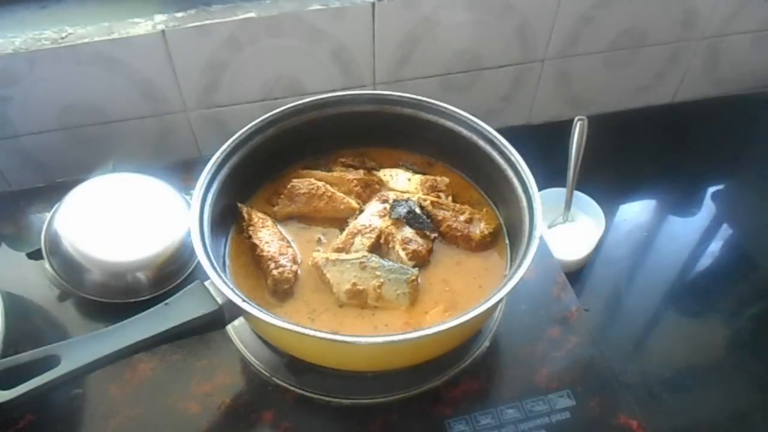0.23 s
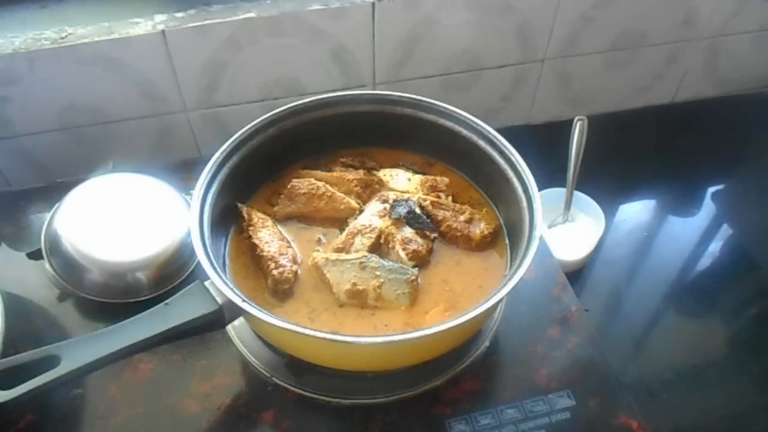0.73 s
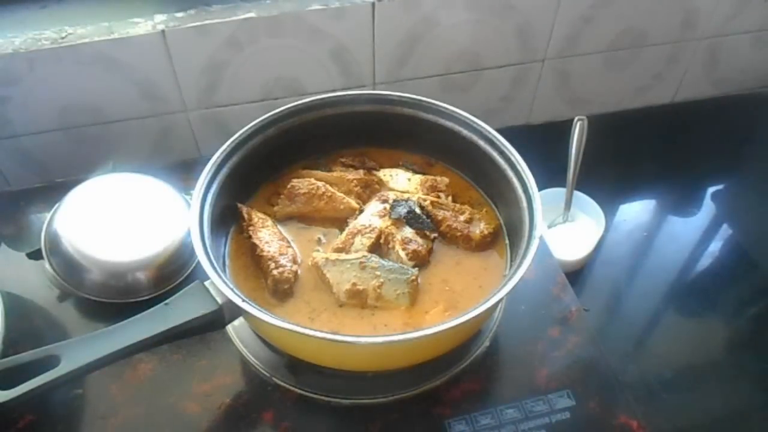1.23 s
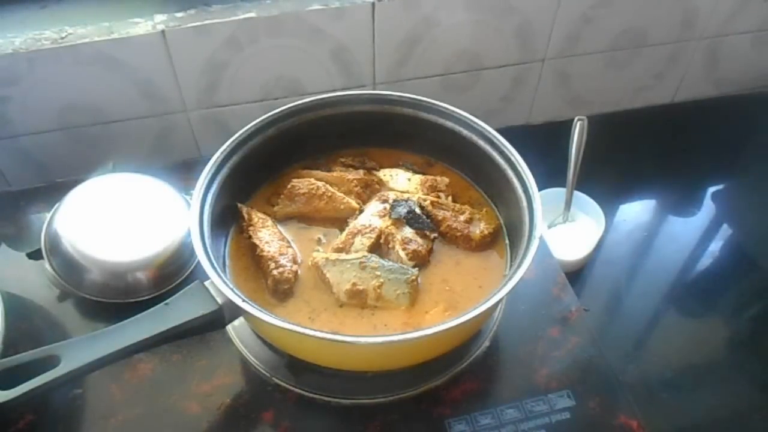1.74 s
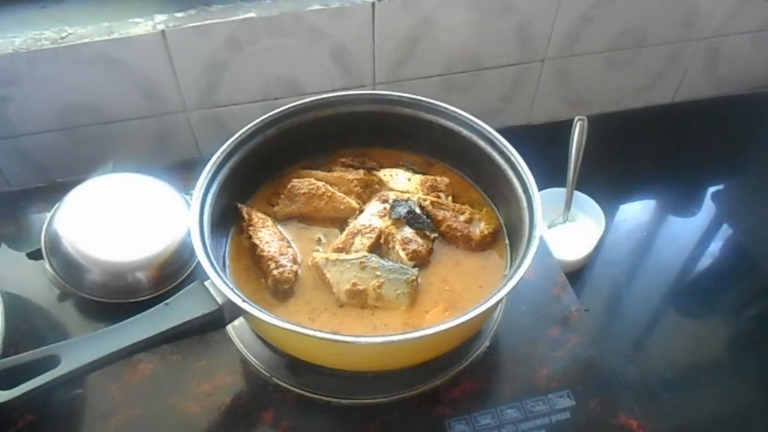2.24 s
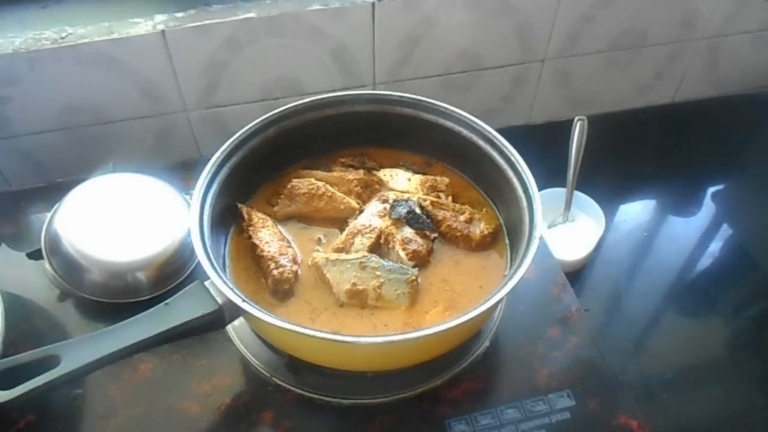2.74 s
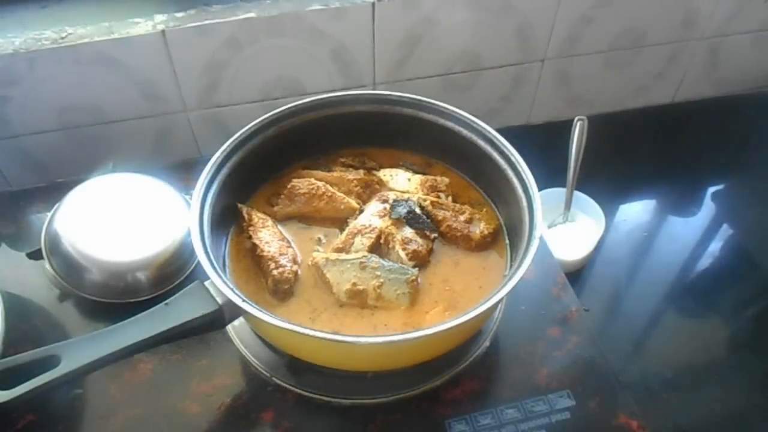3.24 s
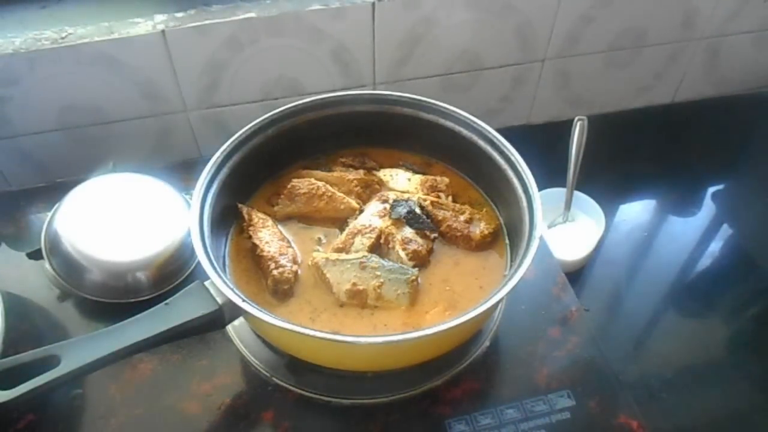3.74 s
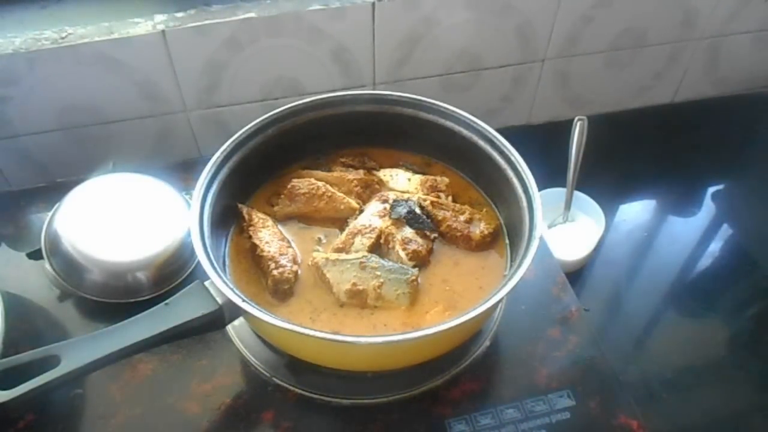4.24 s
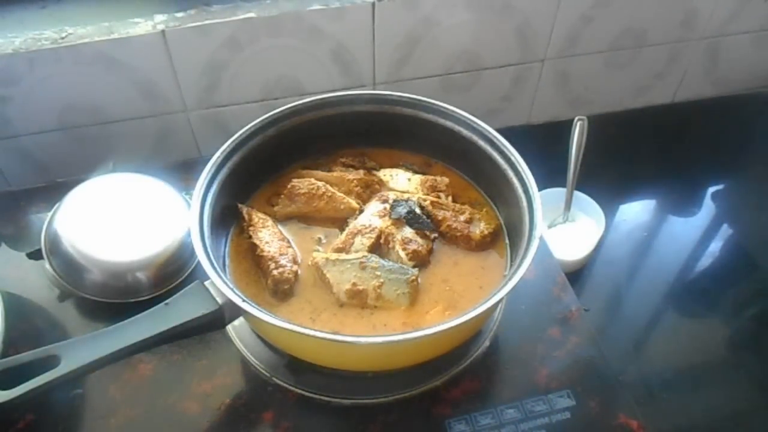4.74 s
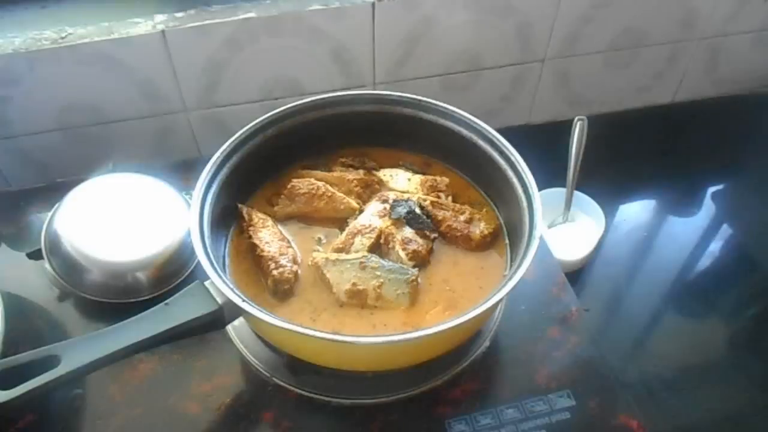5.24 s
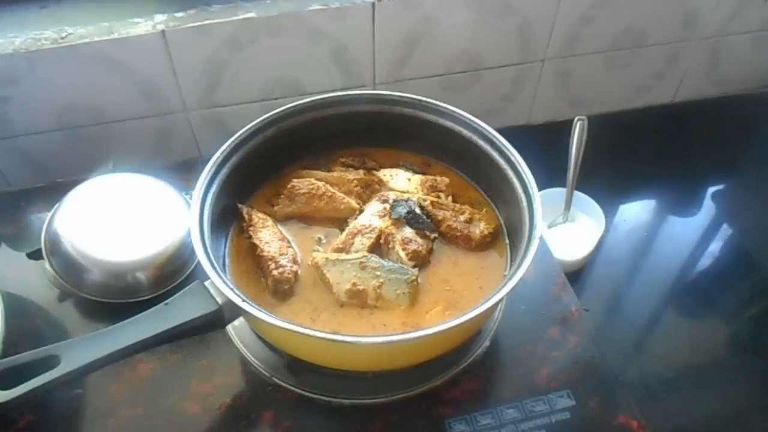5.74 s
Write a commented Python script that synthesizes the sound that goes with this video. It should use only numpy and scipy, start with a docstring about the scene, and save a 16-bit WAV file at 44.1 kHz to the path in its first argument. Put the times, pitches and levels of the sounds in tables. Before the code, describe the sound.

Thin curry heats in a metal pan over a softly rushing burner, with steam squeals, bubble pings, spitting drops and one brief pan clatter.

```python
"""Thin fish curry heats in a metal pan on a gas stove, close to the microphone in a tiled kitchen.
Throughout, the burner rushes as shaped noise and sauce sizzles at the hot wall as grainy noise in surges.
From the start steam squeals out as chains of tiny bubbles, single bubbles ping as decaying sines and
drops spit as noise bursts; after half a second the pan clatters briefly on its damped modes.
Squeals return from 1.4 s on, and single bubbles crowd the second half."""
import sys
import numpy as np
from scipy import signal
from scipy.fft import rfft, irfft
from scipy.io import wavfile
from scipy.ndimage import map_coordinates

SR = 44100
rng = np.random.default_rng(int(sys.argv[2]) if len(sys.argv) > 2 else 0)


def wav_record(signal):
    """Record a signal, one row per channel, as 16-bit PCM in the file named by sys.argv[1]."""
    frames = np.transpose(np.atleast_2d(signal))
    bounded = np.clip(frames, -1, 1)
    # unit amplitude maps onto the largest positive 16-bit level
    quanta = np.round(bounded * 32767).astype(np.int16)
    wavfile.write(sys.argv[1], SR, quanta)


N = 264600
TIME = np.arange(N) / SR  # s

# Every colour is a relative noise spectrum: f/Hz, density/dB per Hz.
# Steam vents: start/s, length/s, rise/s, level before layer gain/dB, top pitch before glide and scoop/Hz,
# glide over the length/octave, half the greatest drop below the top pitch at mid-length/octave
STEAM_VENTS = [(0, 0.09, 0.015, -38, 4250, 0.043, 0.88), (0.073, 0.036, 0.011, -25, 4940, -0.19, 0.32),
               (.122, 0.062, 0.012, -29, 3820, -0.39, 0.24),
               (0.182, 0.24, 0.043, -51.5, 308.6, -0.036, 0.27),
               (0.203, 0.041, 0.0095, -28.5, 4800, 0.12, .35),
               (0.225, 0.067, 0.037, -28, 2690, 0.71, 0.336), (.26, 0.39, 0.023, -36, 3290, -0.215, 0.494),
               (0.458, 0.12, 0.039, -39.5, 903, -0.079, 0.41), (1.379, 0.5, 0.13, -44, 2000, -0.071, 0.46),
               (2.071, 0.12, 0.038, -34.5, 6300, -.06, 0.067),
               (2.136, 0.089, 0.025, -39.5, 2650, -0.47, 0.28), (2.151, .2, 0.063, -39, 5830, -0.073, 0.37),
               (2.412, .25, 0.027, -36.5, 6100, -0.073, 0.41), (2.695, 0.17, .05, -41.5, 6340, -0.66, 0.34),
               (2.732, .09, 0.036, -31.5, 4990, -.6, 0.145), (2.792, 0.19, .045, -32, 4188, -0.057, 0.235),
               (3.88, 0.097, 0.081, -34.5, 2570, 0.466, 0.536),
               (4.328, 0.28, 0.14, -36, 6510, -0.066, 0.47), (4.489, .16, 0.04, -43.5, 2407, -0.38, 0.41),
               (4.747, 0.26, 0.052, -41, 3580, -0.28, 0.65), (5.626, 0.32, 0.014, -35.5, 6020, -0.12, 0.37),
               (5.739, 0.3, .08, -40, 2393, -0.37, .8), (5.824, 0.05, 0.021, -30, 3830, 0.02, 0.11),
               (5.924, 0.091, 0.028, -40, 3690, .25, 0.16)]
# Single bubbles: t/s, f/Hz, nominal peak level/dB, ring t60/s
SINGLE_BUBBLES = [(0.063, 1870, -27, 0.036), (.078, 1986, -22, 0.023), (.19, 1347, -36.5, 0.22),
                  (1.654, 4650, -41, 0.065), (2.511, 3940, -28.5, 0.023), (2.723, 3860, -28, 0.023),
                  (3.147, 2175, -22, 0.039), (3.153, 2250, -24, .014), (3.573, 1640, -27.5, 0.046),
                  (3.596, 3600, -32, 0.028), (3.625, 3350, -27, 0.03), (3.726, 2425, -14, 0.035),
                  (3.82, 5560, -38, .02), (3.914, 2640, -27, 0.0087), (3.94, 3050, -19, 0.0037),
                  (4.505, 1970, -31, 0.023), (4.732, 4640, -25.5, 0.011), (4.757, 2600, -25.5, 0.027),
                  (4.761, 3640, -26, 0.013), (4.791, 2830, -25.5, 0.021), (4.844, 5700, -33, 0.013),
                  (4.852, 2730, -25.5, 0.03), (4.892, 3920, -30, 0.027), (4.92, 2550, -12, 0.003),
                  (4.922, 1550, -24.5, 0.027), (5.107, 6300, -29, 0.033), (5.166, 5700, -30, .018),
                  (5.752, 2020, -28, .018), (5.79, 753, -31, 0.078), (5.83, 1950, -24, .02),
                  (5.859, 1980, -22, 0.021), (5.887, 1790, -24, 0.041), (5.899, 1440, -26, .02)]
# Spitting drops: t/s, level before layer gain/dB, burst t60/s, pan ring relative to burst/dB
SPITTING_DROPS = [(0.0802, -37, 0.039, -13), (0.2148, -27.5, 0.02, -5), (1.1226, -42.5, 0.038, -2),
                  (1.793, -22, 0.043, -9), (2.1228, -18.5, 0.031, -41), (3.1312, -37.5, 0.036, -11),
                  (3.2964, -40.5, 0.078, -22), (3.8363, -47.5, 0.05, 4), (4.2783, -27, 0.015, -20),
                  (4.3051, -21.5, 0.22, -6), (4.6284, -46, 0.026, -1), (4.9151, -39, 0.033, 0.5),
                  (5.7836, -23.5, 0.044, -13.5)]
# Colour of a spit: f/Hz, density/dB per Hz
SPIT_SPECTRUM = [(50, -73), (300, -17), (830, -8.5), (1500, -20), (2450, 0), (3300, -6.5), (4700, -3),
                 (5700, 13), (6900, 6), (7900, -1), (9800, -9), (12500, -35)]
# Surges of sizzle: crest t/s, level before layer gain/dB, swell time constant/s, dying time constant/s
SIZZLE_SURGES = [(.005, -39, .02, 0.027), (.08, -35, 0.013, 0.022), (.15, -38, 0.041, 0.081),
                 (.25, -42.5, 0.033, 0.067), (.36, -49, .05, 0.17), (.85, -48.5, 0.026, 0.065),
                 (.985, -52.5, 0.016, 0.031), (2.15, -52, 0.11, .07), (2.85, -55, 0.11, 0.1),
                 (3.035, -51, 0.046, 0.24), (3.51, -50.5, 0.17, .05), (3.74, -53.5, 0.018, 0.037),
                 (3.93, -53, .06, 0.038), (4.31, -43, .08, .24), (4.57, -43.5, .015, 0.0094),
                 (4.655, -48, 0.03, 0.011), (4.93, -46.5, .012, 0.047), (5.22, -51, 0.26, 0.069),
                 (5.41, -47.5, .02, 0.029), (5.465, -48.5, 0.025, .025), (5.8, -45, 0.08, 0.12),
                 (5.91, -44.5, .05, 0.023)]
# Colour of the sizzle: f/Hz, density/dB per Hz
SIZZLE_SPECTRUM = [(300, -29), (900, -1), (2000, 7), (4000, 12), (6300, 6), (8000, 1.5), (9800, -10.5),
                   (12500, -22.5)]
# Knocks of the pan: t/s, chatter level/dB, chatter t60/s, ring relative to chatter/dB,
# favoured f/Hz, lift at that f/dB
PAN_KNOCKS = [(.548, -27.5, 0.28, -12.5, 830, 26), (0.593, -35.5, 0.15, -1.5, 3230, -6),
              (.616, -15, 0.049, -14, 845, 5.5), (0.648, -28.5, 0.11, -19.5, 1440, 35),
              (.677, -19.5, 0.039, -16, 380, 10.5)]
# Modes of the metal pan: f/Hz, relative level/dB, t60/s
PAN_MODES = [(366.5, -2.5, 0.37), (632, -8, 0.5), (772, -10, 0.45), (853, 0, 0.38), (940, -2.5, 0.43),
             (1440, 2, 0.36), (1400, -1, .25), (1520, -5, 0.33), (1892, -0.5, 0.37), (2214, 4, 0.37),
             (2330, -5.5, 0.21), (2424, 7, 0.2), (2490, -22, 0.12), (2910, 5, 0.084), (3080, -30, 0.12),
             (3290, 10.5, 0.084), (3400, -24, .24), (4140, 2.5, 0.091), (4720, -10, 0.083),
             (4940, -22, 0.094), (6100, -38, 0.087), (7100, -25.5, 0.024), (6950, 1, 0.081)]
# Colour of the chatter: f/Hz, density/dB per Hz
CHATTER_SPECTRUM = [(60, -56.5), (220, -30), (340, 2.5), (520, 0.5), (870, 5), (1130, 0.5), (1440, -5),
                    (2400, 4), (3300, 4.5), (5000, 1.5), (7000, -1.5), (10000, -23), (12500, -60)]
# Steady burner and fine simmer: f/Hz, density/dB per Hz
BURNER_SPECTRUM = [(15, -67), (25, -34), (298, -7.5), (475, -5.5), (569, -5.5), (665, -3), (954, 2.5),
                   (1440, 0.5), (1600, -3), (1770, -3.5), (2300, -4.5), (2820, -5.5), (3560, -4.5),
                   (7160, -27), (12000, -128), (15600, -80), (22000, -120)]
# Hollow tones of the flame under the pan: f/Hz, width/Hz, lift/dB
FLAME_RESONANCES = [(92.4, 33, 9), (137, 24, 9), (550, 185, 7.5), (800, 29, 4), (1760, 267, 8),
                    (2326, 200, 7), (7370, 750, 20.5)]


def undb(db):
    """Amplitude ratio is ten to the power of level over twenty."""
    return 10 ** (np.asarray(db) / 20)


def unit(x):
    """Dividing by the root mean square gives unit rms."""
    return x / np.sqrt(np.mean(x ** 2) + 1e-20)


def shape(hz, colour):
    """A spectrum level is interpolated on a logarithmic frequency axis."""
    points, db = np.transpose(colour)
    return np.interp(np.log(hz), np.log(points), db)


def noise(colour, tones=()):
    """Spectral shaping: white noise is weighted by a colour plus broad resonances, at rms 1."""
    hz = np.arange(N // 2 + 1) * SR / N + 1e-3  # the offset avoids log(0)
    db = shape(hz, colour)
    for centre, width, lift in tones:
        db = db + lift / (1 + (2 * (hz - centre) / width) ** 2)
    white = rng.standard_normal(N)
    return unit(irfft(rfft(white) * undb(db), N))


def walk(knots_per_s):
    """Band-limited chance: random levels are joined smoothly, with rms 1."""
    knots = rng.standard_normal(4096)
    return unit(map_coordinates(knots, [TIME * knots_per_s], order=2, mode="wrap"))


def add(out, start_s, sound):
    """Superposition: a sound is summed into the mixture from its start time."""
    i = max(int(start_s * SR), 0)
    part = sound[:max(N - i, 0)]
    out[i:i + len(part)] += part


def fade(t, t60):
    """Exponential decay: the level falls by 60 dB in t60."""
    return undb(-60 * t / t60)


def bubble(hz, t60, glide=0.0097, swell_cycles=0.35):
    """Damped oscillator: a bubble swells quickly, then rings down while its pitch creeps up."""
    t = TIME[:int(t60 * SR) + 2]
    swell = 1 - np.exp(-(t * hz / swell_cycles) ** 2)
    cycles = hz * t * (1 + glide * t / t60)
    return swell * fade(t, t60) * np.sin(2 * np.pi * cycles)


def ring(modes):
    """Modal superposition: each blow lands elsewhere and so meets the modes in another phase."""
    t = TIME[:SR // 2]
    total = np.zeros(len(t))
    for hz, db, t60 in modes:
        total += undb(db) * fade(t, t60) * np.sin(2 * np.pi * (hz * t + rng.random()))
    rise = 1 - np.exp(-(t / .0008) ** 2)  # the modes build up in about a millisecond
    return rise * total


def vents(gain_db=-1, rise_db=11, fall_db=12, t60=0.042, uneven_db=2):
    """Bubble chains: steam squeezes through a gap that sets the top pitch; merged bubbles sound lower."""
    scoop_octaves, scoop_share = 0.39, 0.288  # pitch rises as the gap opens, over this share of the rise
    crowding = 2.47  # the higher, the more bubbles stay near the top pitch
    widening = 0.53  # merging grows with age: scatter goes from 1 - this to 1 + this times its mean
    out = np.zeros(N)
    for start, length, rise, db, top_hz, glide, scatter in STEAM_VENTS:
        chain = np.zeros(N)
        bubbles_per_s = top_hz / 6  # big, low bubbles come less often than small ones
        for k in range(min(int(length * bubbles_per_s), 1024)):
            age = (k + rng.random()) / bubbles_per_s
            scoop = scoop_octaves * np.exp(-age / (scoop_share * rise))
            gap = glide * age / length - scoop
            spread = scatter * (1 + widening * (2 * age / length - 1))
            merged = 2 * spread * rng.random() ** crowding
            ping = bubble(top_hz * 2 ** (gap - merged), t60, glide=0, swell_cycles=3.5)
            strength = undb(uneven_db * np.clip(rng.standard_normal(), -2, 2))
            add(chain, start + age, strength * ping)
        chain /= np.sqrt(np.sum(chain ** 2) / (length * SR))  # rms 1 over the vent's length
        # the flow builds up, then sinks as the steam is spent
        flow_db = np.interp(TIME - start, [0, min(rise, length), length], [-rise_db, 0, -fall_db])
        out += chain * undb(db + flow_db + gain_db)
    return out


def bubbles(snap_db=-14, snap_t60=0.017, small_db=-47, spread_db=5.5, small_t60=0.0033, count=240):
    """Bubble resonance: larger bubbles snap open and ping singly among many faint small ones."""
    out, spray, t = np.zeros(N), noise(SIZZLE_SPECTRUM), TIME[:SR // 10]
    for s, hz, db, t60 in SINGLE_BUBBLES:
        add(out, s, undb(db) * bubble(hz, t60))
        snap = np.roll(spray, rng.integers(N))[:len(t)] * fade(t, snap_t60)
        add(out, s, undb(db + snap_db) * snap)
    for when, pitch, size in rng.random((count, 3)):
        db = small_db - spread_db * np.log(max(size, .02))  # few are much louder than the rest
        add(out, when * N / SR, undb(db) * bubble(1200 * 7 ** pitch, small_t60, swell_cycles=2.7))
    return out


def spits(gain_db=-5, flash_s=0.0057):
    """Flash boiling: a drop on hot metal sprays sharp noise that rings mainly the pan's high modes."""
    out, spray, t = np.zeros(N), noise(SPIT_SPECTRUM), TIME[:SR // 2]
    modes = [(hz, db + shape(hz, SPIT_SPECTRUM), t60) for hz, db, t60 in PAN_MODES]
    for s, db, t60, wall_db in SPITTING_DROPS:
        decay = fade(np.maximum(t - flash_s, 0), t60)  # held during the flash
        burst = np.roll(spray, rng.integers(N))[:len(t)] * decay
        add(out, s, undb(db + gain_db) * (burst + undb(wall_db) * ring(modes)))
    return out


def knocks(chatter_s=0.012, relative_width=0.27, lowest_hz=270):
    """Impact excitation: the pan bumps its support, chatters and rings, damped by the sauce."""
    out, t = np.zeros(N), TIME[:SR // 2]
    for s, db, t60, ring_db, main_hz, lift_db in PAN_KNOCKS:
        # the spot that is struck weights one broad resonance
        resonance = (main_hz, relative_width * main_hz, lift_db)
        clatter = noise(CHATTER_SPECTRUM, [resonance])[:len(t)]
        chatter = clatter * fade(np.maximum(t - chatter_s, 0), t60)
        add(out, s, undb(db) * (chatter + undb(ring_db) * ring(PAN_MODES)))
    # a pan is too small to radiate deep bass
    return signal.sosfilt(signal.butter(2, lowest_hz, "high", fs=SR, output="sos"), out)


def sizzle(gain_db=7, simmer_db=-59.5, grain_db=1.5):
    """Wall boiling: lapping sauce bursts in countless tiny grains, surging over a steady simmer."""
    power = undb(simmer_db) ** 2  # simmer and surges are levels before the gain
    for crest, db, swell_s, dying_s in SIZZLE_SURGES:
        time_constant = np.where(TIME < crest, swell_s, dying_s)
        envelope = np.exp(-np.abs(TIME - crest) / time_constant)
        power = power + (undb(db) * envelope) ** 2
    grains = undb(grain_db * walk(600) + .5 * walk(97))
    return unit(noise(SIZZLE_SPECTRUM) * grains) * np.sqrt(power) * undb(gain_db)


def burner(level_db=-44.5, flutter_db=0.5):
    """Turbulent combustion: flame and fine simmer make a soft, slightly fluttering rush."""
    rush = noise(BURNER_SPECTRUM, FLAME_RESONANCES)
    return rush * undb(level_db + flutter_db * walk(12))


def kitchen(x, wet_db=-7, t60=0.31):
    """Reverberation: tiles and worktop answer within a few milliseconds and leave a short tail."""
    t = TIME[:SR // 2]
    tail = rng.standard_normal(len(t)) * fade(t, t60) * (t > .003)
    return x + undb(wet_db) * signal.fftconvolve(x, tail / np.linalg.norm(tail))[:N]


def scene():
    """Superposition at one microphone: all sources lie at the one pan, so both channels are equal."""
    events = vents() + bubbles() + spits() + knocks()
    mono = kitchen(events) + sizzle() + burner()
    return np.array([mono, mono])


def record(dry):
    """Band limiting: a band-stop dips the mix at 10.35-12 kHz; a steep low-pass ends it at 12.5 kHz."""
    dip = signal.butter(2, [10350, 12000], "bandstop", fs=SR, output="sos")
    cut = signal.ellip(8, .3, 70, 12500, fs=SR, output="sos")  # ripple/dB, stopband depth/dB, edge/Hz
    return signal.sosfilt(np.vstack([dip, cut]), dry)


dry = scene()
out = record(dry)
wav_record(out)
```